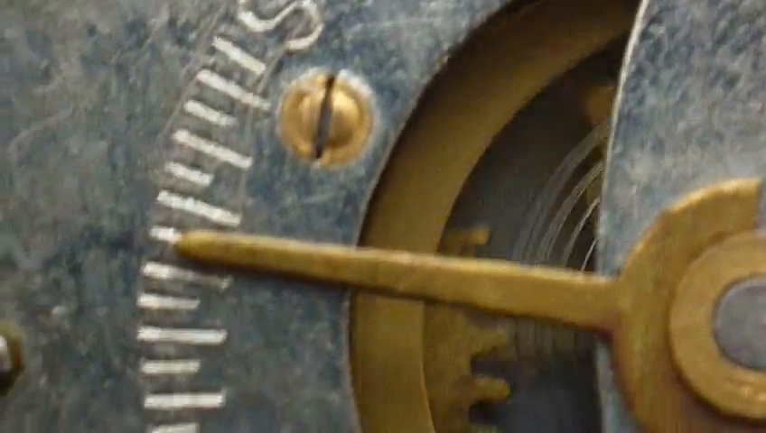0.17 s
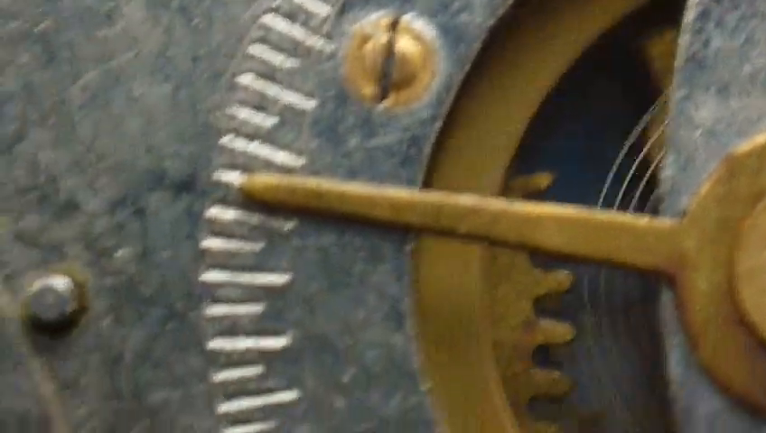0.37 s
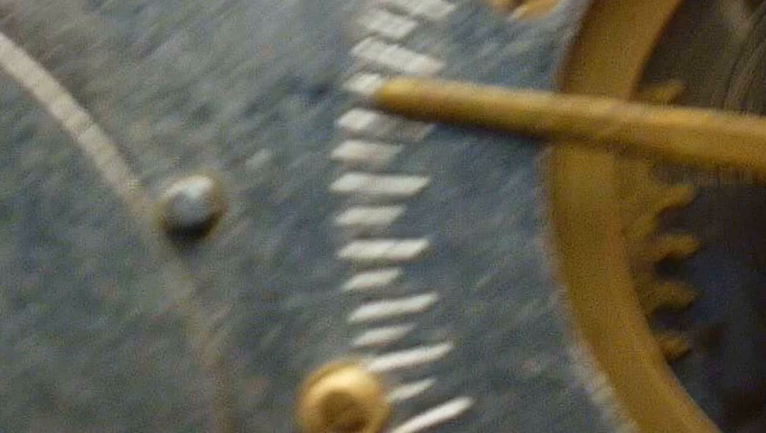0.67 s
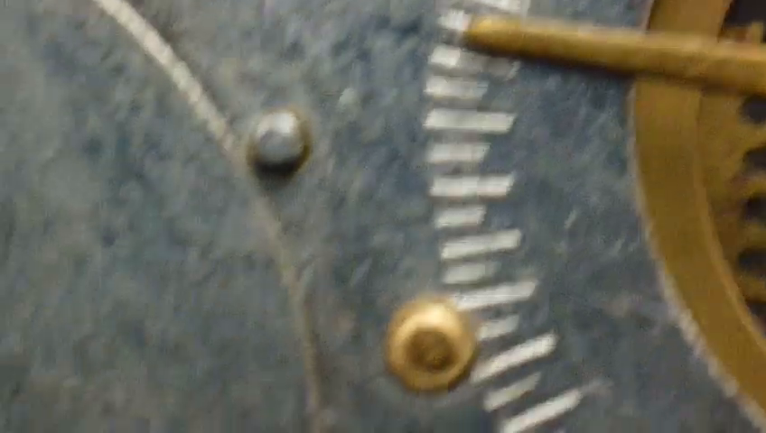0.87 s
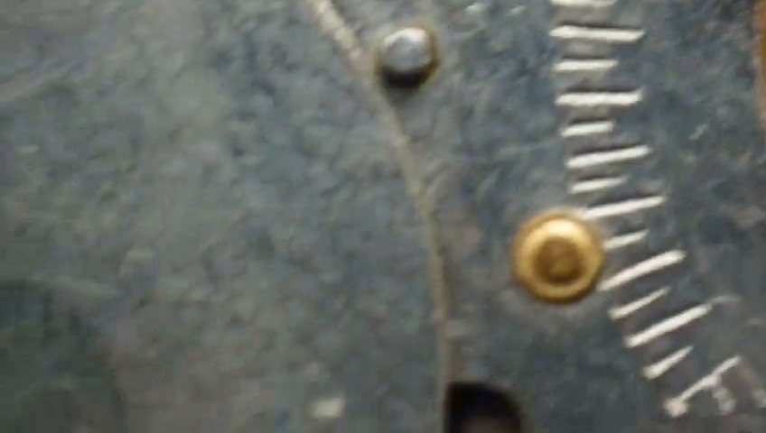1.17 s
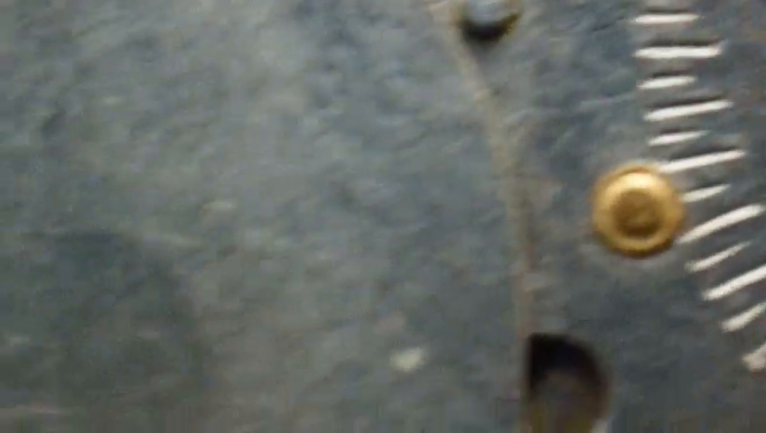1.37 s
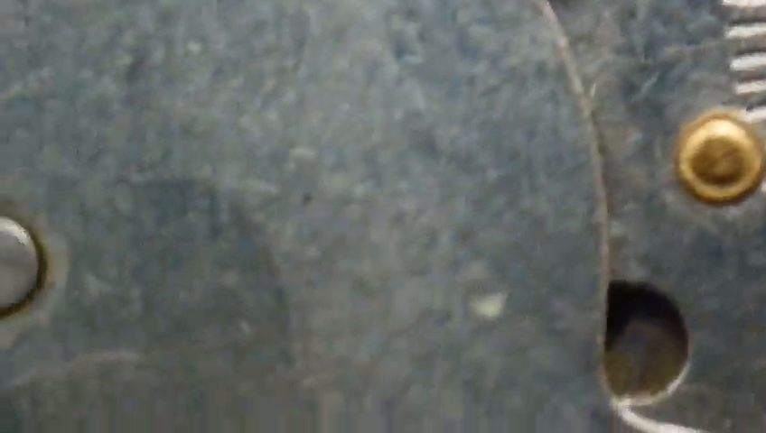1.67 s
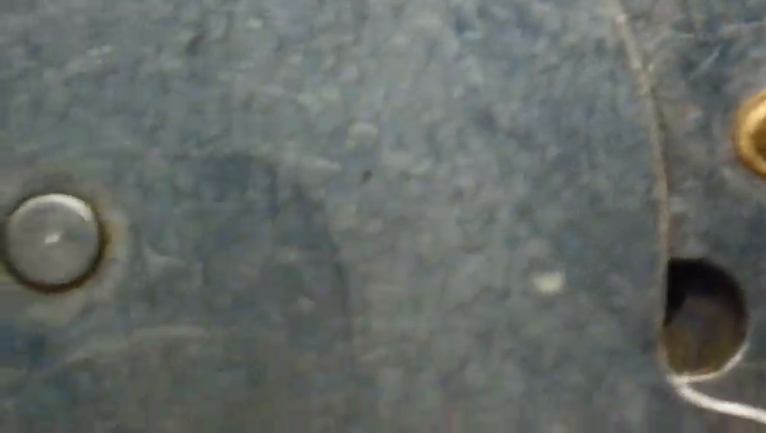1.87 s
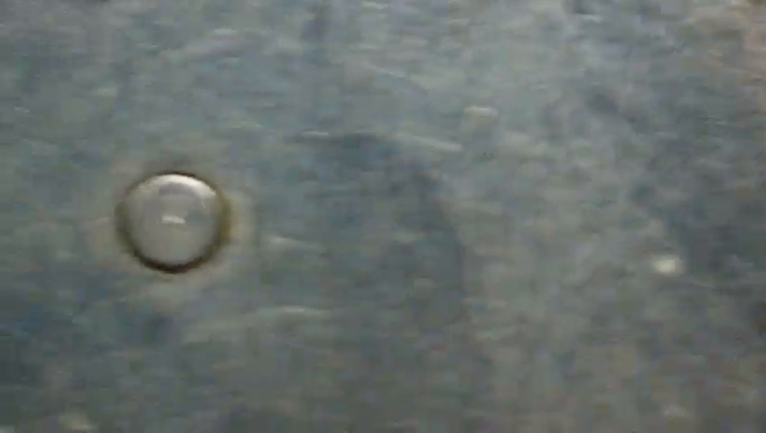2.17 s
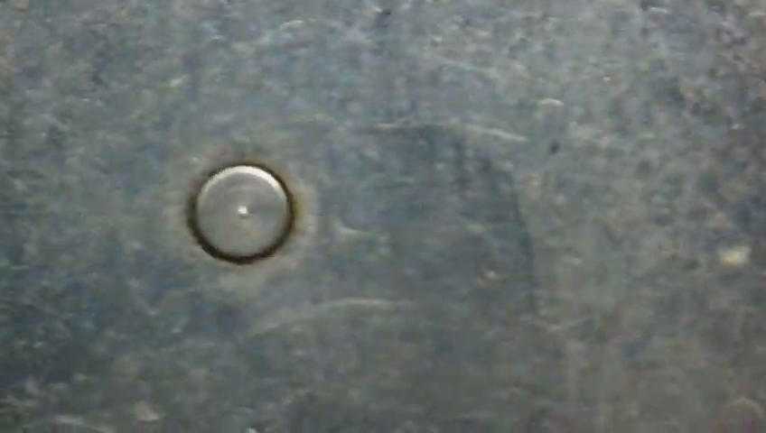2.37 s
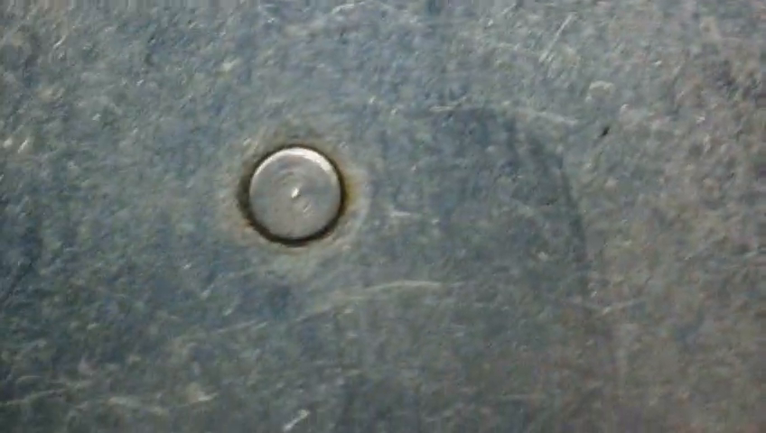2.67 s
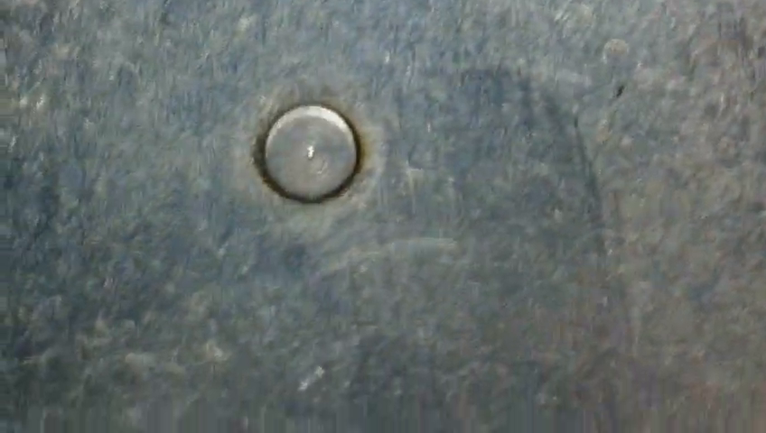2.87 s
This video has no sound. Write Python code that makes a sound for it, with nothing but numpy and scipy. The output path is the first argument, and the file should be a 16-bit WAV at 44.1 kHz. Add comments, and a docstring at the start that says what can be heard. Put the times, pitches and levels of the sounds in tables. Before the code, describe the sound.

A mechanical pocket watch ticks steadily from 0 to 3 seconds, about one beat every quarter second, tick and tock slightly different. Each beat is a tiny triple click ending in the strongest, with bright, brief metallic ringing and a short room tail. Irregular static clicks and faint soft knocks fall between. Quiet hiss and murmur persist; a faint low drone swells near 1 and 1.9 seconds. Close microphone, dulled highest treble.

```python
"""A pocket watch ticks about four times a second, very near the microphone, in a quiet room.
In each beat the lever escapement unlocks, pushes the balance and drops onto the other pallet:
three short bursts of noisy chatter that ring the plates, followed by a short, weak room tail.
Static clicks and soft knocks come in between, and a low drone comes and goes.
Noise shaped into murmur and hiss, and faint hum and whine tones, run throughout."""
import sys
import numpy as np
from scipy import signal
from scipy.fft import rfft, irfft
from scipy.io import wavfile
from scipy.ndimage import uniform_filter1d

SR = 44100
rng = np.random.default_rng(int(sys.argv[2]) if len(sys.argv) > 2 else 0)


def pcm_store(signal):
    """Save signal as 16-bit PCM."""
    levels = np.round(np.clip(np.atleast_2d(signal), -1, 1) * 32767)
    wavfile.write(sys.argv[1], SR, levels.astype(np.int16).T)


N = 133182  # length in samples, about 3 s


def amp(db):
    """Turns decibels into a gain."""
    return 10 ** (np.asarray(db) / 20)


def unit(x):
    """Scales a sound to an rms of 1."""
    return x / np.sqrt(np.mean(x ** 2) + 1e-20)


def add(mix, start_s, sound):
    """Mixes a sound in at its start time, cutting off what falls outside."""
    at = round(start_s * SR)
    sound = sound[max(-at, 0):]
    part = mix[max(at, 0):][:len(sound)]
    part += sound[:len(part)]


def watch():
    """The lever makes three contacts in each beat, on the two pallets in turn."""
    # Beats, tick and tock in turn:
    # drop_s, brightness (dB per octave), unlock_db, impulse_db, drop_db
    beats = [(.0117, 0, -54, -52.5, -47), (.2462, -1, -53.5, -52, -47.5), (.5147, -1.5, -58.5, -47.5, -47),
             (.7484, 0.5, -54, -53, -48.5), (1.0169, -2, -54, -50, -45.5), (1.2503, 1, -51.5, -53, -48),
             (1.5193, -0.3, -60, -49, -45), (1.7529, -1, -54, -54.5, -46.5), (2.0217, 0.9, -52, -50.5, -43),
             (2.2559, 0, -53, -49, -46), (2.5238, -0.5, -53.5, -49, -43.5), (2.7587, -2, -54, -49, -44),
             (3.0261, 2, -56.5, -51.5, -43)]
    # Unlock, impulse and drop on each pallet:
    # lead before the drop (s), rise_s, hold_s, fade_s, tilt (dB per octave, before brightness)
    tick_contacts = [(.0355, 0.0017, 0.0032, 0.007, -7), (.0148, 0.001, 0.0053, .0018, -9.5),
                     (0.00027, 0.000079, 0.0011, 0.004, -0.6)]
    tock_contacts = [(.0355, .0015, .0045, 0.0024, -5), (.0143, .0005, 0.0022, 0.0039, -2),
                     (0, 0.00096, 0.0024, 0.0011, 0.5)]
    out = np.zeros(N)
    for k, (drop_s, bright_db, *levels_db) in enumerate(beats):
        side = k % 2  # 0 is a tick, 1 is a tock
        contacts = (tick_contacts, tock_contacts)[side]
        for stage, (lead_s, rise_s, hold_s, fade_s, tilt_db) in enumerate(contacts):
            burst = contact(side, rise_s, hold_s, fade_s, tilt_db + bright_db, is_drop=stage == 2)
            add(out, drop_s - lead_s, amp(levels_db[stage]) * burst)
    return out


def contact(side, rise_s, hold_s, fade_s, tilt_db, is_drop):
    """Steel chatters on a jewel and rings the plates: a burst of fixed energy."""
    # Ringing of the plates and bridges:
    # pitch_hz, t60_s (time to fade by 60 dB), relative tick_db, relative tock_db
    plate_modes = [(1630, 0.032, -5.4, -4.5), (2210, .018, -10, -9.5), (2550, 0.026, -10, -8),
                   (3090, 0.036, -4, -5.5), (3423, 0.018, -1, 2), (3820, 0.0086, 1, -4.5),
                   (4100, .018, -6, -11), (4460, 0.0077, -10.5, -21), (5253, 0.013, -2.5, -1.9),
                   (5687, .012, -2.5, -3.5), (5860, 0.17, -12, -17), (6020, 0.025, -2.5, -7),
                   (7075, 0.0045, -4, -5.5), (7960, 0.0057, -5, -14.5), (9070, 0.004, -15.5, -13)]
    impacts_per_s, scrape = 3500, 0.39  # tiny impacts; share of sliding noise under them
    first_blow = 0.13  # against a chatter of total energy 1
    rebound_s, rebound_db, rebound_spread = .0038, -10.5, .25
    spread_db, detune = 2.8, 0.0046  # no two contacts excite the plates alike
    build_s = 0.0002  # the ringing builds up as the blow spreads through the plates

    t = np.arange(SR // 10) / SR
    impacts = rng.random(len(t)) < impacts_per_s / SR
    grains = rng.standard_normal(len(t)) * (impacts + scrape)
    envelope = np.minimum(t / rise_s, 1) * np.exp(-np.maximum(t - hold_s, 0) / fade_s)
    force = grains * envelope
    force = force / np.linalg.norm(force)
    if is_drop:
        add(force, 0, np.array([first_blow]))
        # The lever bounces once after the drop.
        bounce_s = rebound_s * (1 + rebound_spread * rng.uniform(-0.7, 1))
        add(force, bounce_s, amp(rebound_db) * force)

    sound = np.zeros(len(t))
    for pitch_hz, t60_s, *level_db in plate_modes:
        tilted_db = level_db[side] + tilt_db * np.log2(pitch_hz / SR)
        gain = amp(tilted_db + spread_db * rng.standard_normal())
        detuned_hz = pitch_hz * (1 + detune * rng.standard_normal())
        ring = np.sin(2 * np.pi * (detuned_hz * t + rng.random()))
        ring *= (1 - np.exp(-t / build_s)) * np.exp(-np.log(1000) * t / t60_s)
        sound += gain * unit(signal.fftconvolve(force, ring)[:len(t)])
    return unit(sound) / np.sqrt(10)  # the energy of a full second at rms 0.1 in each burst's 0.1 s x 10


def room(x):
    """Nearby surfaces return a short, weak tail of fading noise."""
    t60_s, tail_db = 0.11, -12.5
    t = np.arange(SR // 4) / SR
    fade = np.exp(-np.log(1000) * t / t60_s)
    tail = rng.standard_normal(len(t)) * fade * (t > .002)  # nothing returns in the first 2 ms
    return x + amp(tail_db) * signal.fftconvolve(x, tail / np.linalg.norm(tail))[:N]


def knocks():
    """Dull bumps of narrow noise swell and die within a few hundredths of a second."""
    # Soft background knocks: start_s, pitch_hz, level_db
    bumps = [(.19, 1440, -53), (.36, 240, -50.5), (0.656, 1580, -54.5), (1.654, 250, -54),
             (1.66, 1520, -56), (2.305, 1370, -56.5), (2.67, 1580, -59.5)]
    rise_s, width = 0.0092, .14  # time to the peak; bandwidth setting as a share of the pitch
    out = np.zeros(N)
    age = np.arange(SR // 5) / SR / rise_s
    swell = age * np.exp(1 - age)  # peaks at 1
    for start_s, pitch_hz, level_db in bumps:
        noise = unit(tone(pitch_hz, width * pitch_hz)[:len(age)])
        add(out, start_s, amp(level_db) * swell * noise)
    return out


def static():
    """Electrical spikes, with no ring, are dulled by a simple low-pass filter."""
    # Louder static clicks: start_s, level_db
    clicks = [(.0479, -37.5), (0.3716, -35), (.5541, -36), (0.5805, -30), (0.5916, -40), (0.6545, -34),
              (0.708, -38), (0.897, -34), (0.9264, -36.5), (0.9693, -38), (1.0477, -33), (1.1897, -35),
              (1.1952, -36), (1.332, -34.5), (1.41, -31), (1.5567, -35), (1.567, -34.5), (1.795, -40),
              (2.1312, -37.5), (2.299, -36), (2.555, -36), (2.654, -35), (2.693, -35), (2.8324, -34),
              (2.933, -35), (2.9411, -33.5)]
    crackle_per_s, crackle_db = 22, -45.5  # fainter static in between
    dull_hz = 4500  # the spikes are dulled above this
    crackle = rng.standard_normal(N) * (rng.random(N) < crackle_per_s / SR)
    out = amp(crackle_db) * crackle
    for start_s, level_db in clicks:
        add(out, start_s, np.array([amp(level_db)]))
    return signal.lfilter([1], [1, -np.exp(-2 * np.pi * dull_hz / SR)], out)


def hum():
    """Narrow noise makes wavering tones and a drone; plain sines make a steady whine."""
    # Wavering hum and thin high tones: pitch_hz, width_hz, level_db
    wavering = [(124, 8.6, -67.5), (245.9, 7, -61.5), (7760, 44, -92.5), (8200, 20, -89)]
    # The low drone comes and goes: time_s, level_db
    drone_levels = [(0, -66.5), (0.699, -62.5), (1.0, -53), (1.201, -57.5), (1.4, -66), (1.599, -63.5),
                    (1.9, -58.5), (2.1, -73.5), (3.02, -63.5)]
    # Faint steady whine: pitch_hz, level_db
    whine_tones = [(1102, -74), (2204, -82), (2755, -82.5)]
    t = np.arange(N) / SR
    drone_db = np.interp(t, *np.transpose(drone_levels))
    out = amp(drone_db) * tone(180.2, 9)
    for pitch_hz, level_db in whine_tones:
        out += amp(level_db) * unit(np.sin(2 * np.pi * pitch_hz * t))
    for pitch_hz, width_hz, level_db in wavering:
        out += amp(level_db) * tone(pitch_hz, width_hz)
    return out


def tone(pitch_hz, width_hz):
    """Noise passes through one resonance: an unsteady tone when narrow."""
    f = np.fft.rfftfreq(N, 1 / SR)
    resonance = 1 / (1 + ((f - pitch_hz) / width_hz) ** 2)
    return unit(irfft(rfft(rng.standard_normal(N)) * resonance, N))


def background():
    """Shaped noise makes room murmur in slowly shifting patches, under smooth hiss."""
    # Room murmur and hiss, as a spectrum: pitch_hz, relative level (dB per Hz)
    spectrum = [(20, -22), (55, -17), (90, -8.5), (130, -3.5), (260, 0.5), (420, -4.5), (540, -5.5),
                (670, -4), (850, -9), (1150, -12), (1550, -10), (2000, -13.5), (2700, -16.5), (4500, -18.5),
                (6500, -20), (8200, -27.5), (9000, -36), (10000, -27)]
    # Swell of the murmur's middle range: time_s, relative level_db
    murmur_levels = [(0, -1.5), (0.501, 0), (0.801, 3), (1.101, -1), (1.4, 1.5), (1.799, 2), (2.099, 0.5),
                     (2.452, 1), (2.649, 1.5), (3.02, 1.5)]
    floor_db = -52.5
    murmur_hz, murmur_octaves = 796, 1  # centre and spread of the swelling range
    patch_db, patch_s, patch_hz = 1.67, .09, 300  # strength and size of the patches
    patch_top_hz = 2520  # patches weaken above this
    size = 1024
    hop = size // 4
    hz = np.fft.rfftfreq(size, 1 / SR)

    # Rows are moments in time, columns are frequencies.
    real, imaginary, patches = rng.standard_normal((3, N // hop + 10, len(hz)))
    patches = uniform_filter1d(patches, max(1, round(patch_s * SR / hop)), axis=0)
    patches = unit(uniform_filter1d(patches, max(1, round(patch_hz * size / SR)), axis=1))
    f, db = np.transpose(spectrum)
    field_db = np.interp(np.log(hz + 1), np.log(f), db)
    field_db = field_db + patch_db * patches / (1 + (hz / patch_top_hz) ** 2)
    swell_db = np.interp(np.arange(len(real)) * hop / SR, *np.transpose(murmur_levels))
    octaves_away = np.log2((hz + 1) / murmur_hz)
    field_db += swell_db[:, None] * np.exp(-(octaves_away / murmur_octaves) ** 2 / 2)

    frames = (real + 1j * imaginary) * amp(field_db)
    noise = signal.istft(frames.T, nperseg=size, noverlap=size - hop)[1][:N]
    return amp(floor_db) * unit(noise)


def scene():
    """The watch sounds in its room, with the noise around it."""
    return (room(watch()) + knocks() + static() + hum() + background())[None]


def record(dry):
    """A narrow-band recorder cuts the highest treble and adds a constant offset."""
    edge_hz, offset = 9050, -.0754
    lowpass = signal.firwin(85, edge_hz, window=("kaiser", 8), fs=SR)
    return signal.oaconvolve(dry, lowpass[None], "same") + offset


dry = scene()
out = record(dry)
pcm_store(out)
```